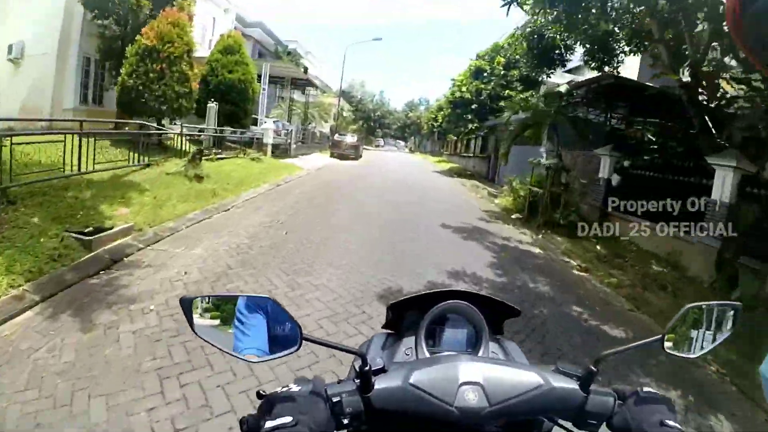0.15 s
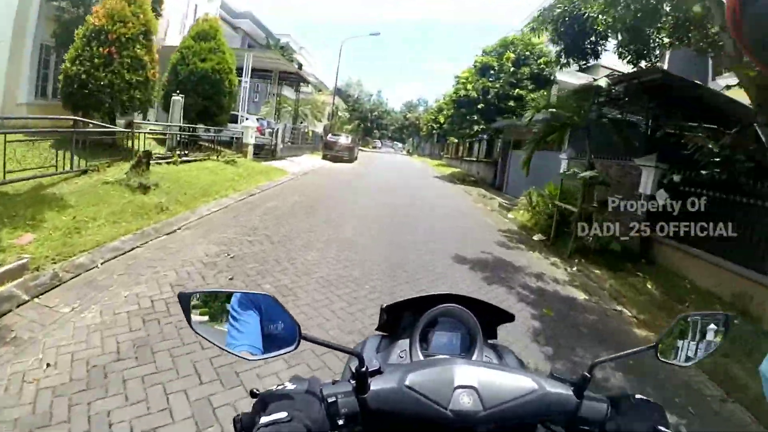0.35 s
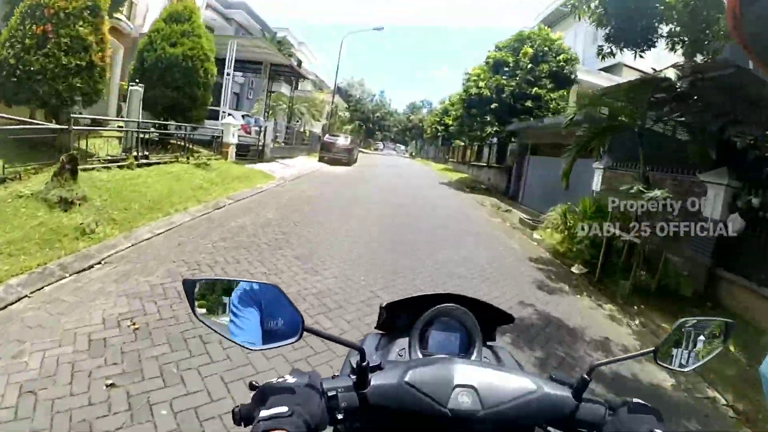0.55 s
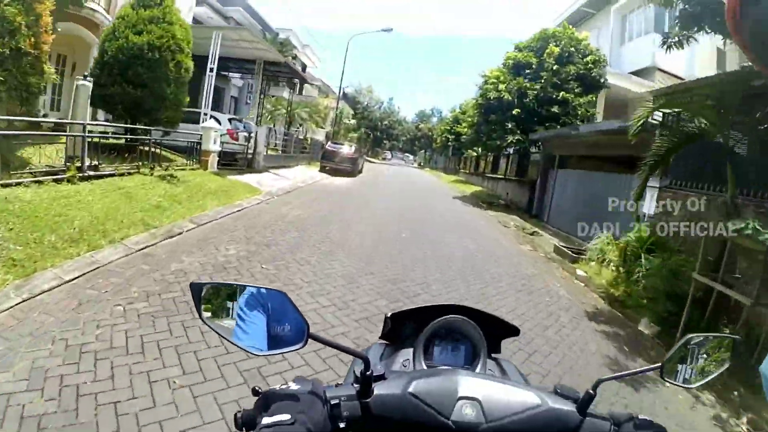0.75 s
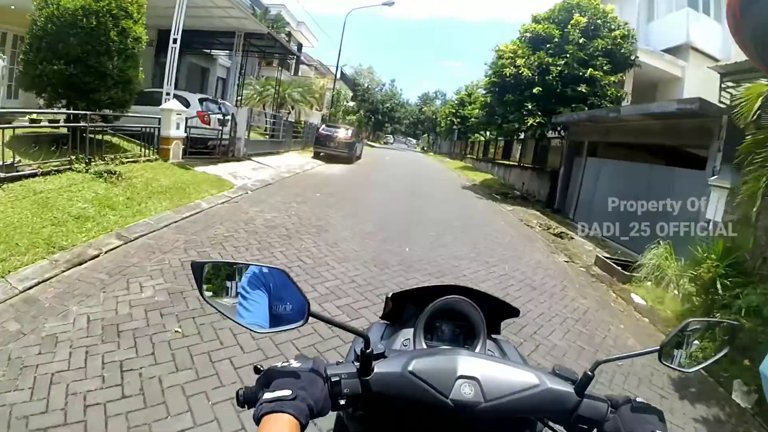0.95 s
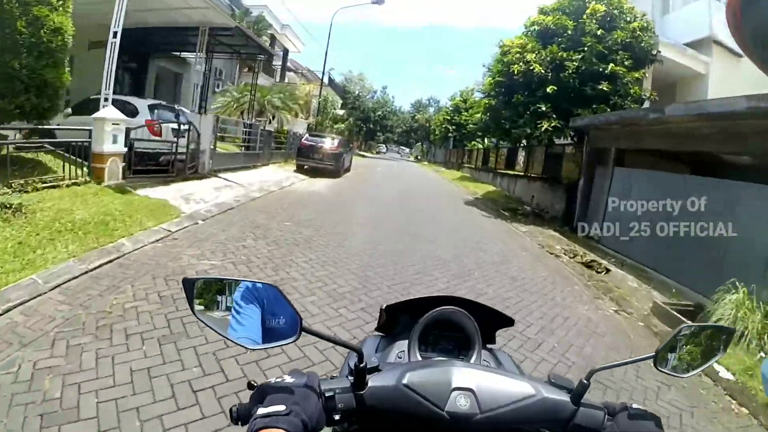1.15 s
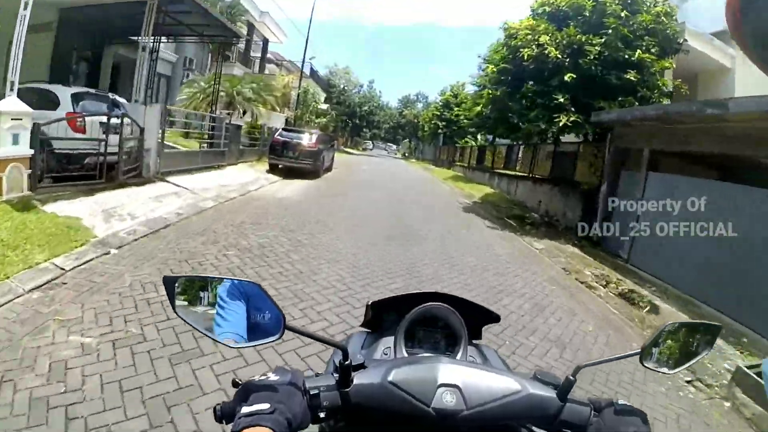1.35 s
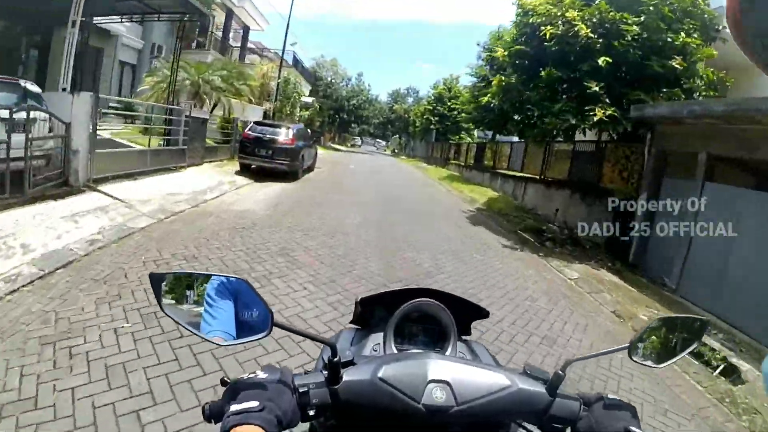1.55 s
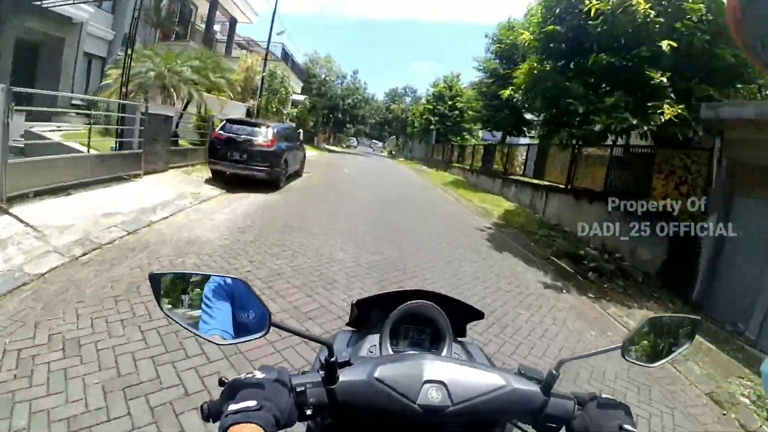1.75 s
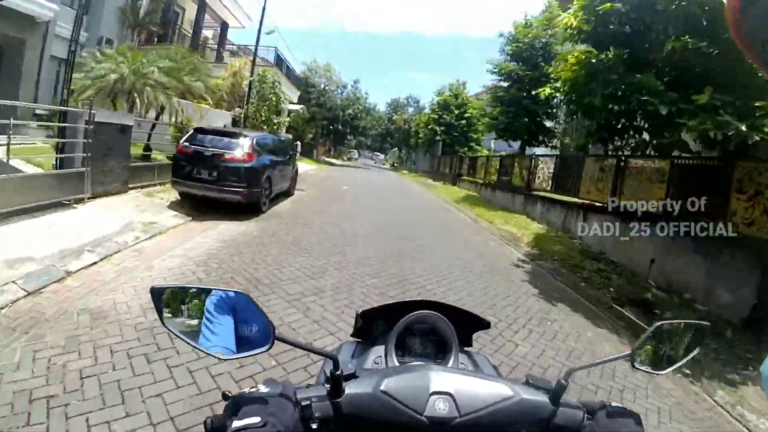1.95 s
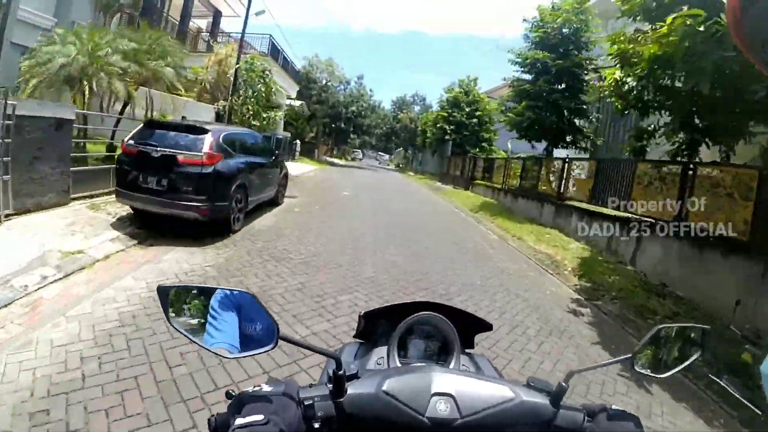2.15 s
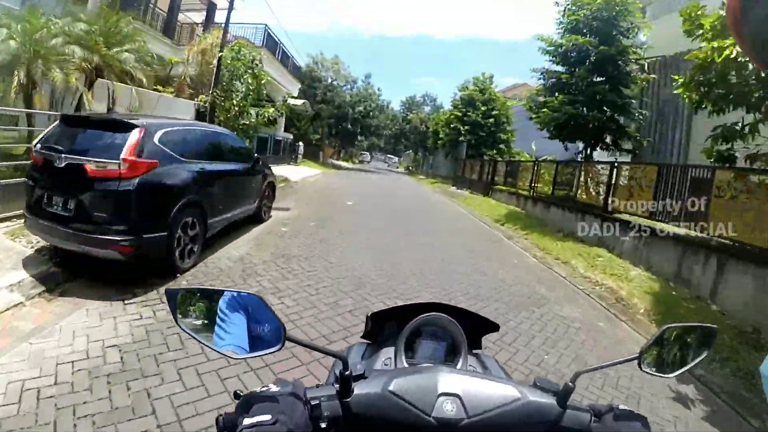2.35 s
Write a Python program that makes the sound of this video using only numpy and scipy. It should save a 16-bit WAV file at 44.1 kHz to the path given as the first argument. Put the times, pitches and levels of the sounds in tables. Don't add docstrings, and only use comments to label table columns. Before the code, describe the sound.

A small single-cylinder scooter engine hums steadily, with muffled tyre and wind rush over paving blocks

```python
import sys
import numpy as np
from scipy import signal
from scipy.fft import rfft, irfft, next_fast_len
from scipy.io import wavfile
from scipy.ndimage import uniform_filter1d, map_coordinates

SR = 44100
rng = np.random.default_rng(int(sys.argv[2]) if len(sys.argv) > 2 else 0)


def gain_from_db(level_db):
    decades = np.asarray(level_db, float) / 20
    return 10 ** decades


def waveform_to_disk(signal):
    frames = np.transpose(np.atleast_2d(signal))
    scaled = np.clip(frames, -1, 1) * 32767
    samples = np.round(scaled).astype(np.int16)
    wavfile.write(sys.argv[1], SR, samples)


N = 109897


def unit(x):
    return x / np.sqrt(np.mean(x ** 2) + 1e-20)


def curves(rows):
    s, *cols = np.transpose(rows)
    return [np.interp(np.arange(N) / SR, s, c) for c in cols]


def wobble(rate):
    return map_coordinates(rng.standard_normal(400), [np.arange(N) * rate / SR])


def rush(spectrum, patchy_db):
    z = signal.stft(rng.standard_normal(N + 1024), nperseg=512)[2]
    field = uniform_filter1d(rng.standard_normal(z.shape), size=5, axis=0)
    field = uniform_filter1d(field, size=5, axis=1)
    x = signal.istft(z * gain_from_db(patchy_db * unit(field)), nperseg=512)[1][:N]
    m = next_fast_len(N + 8192)
    f, db = np.transpose(spectrum)
    log_f = np.log(np.fft.rfftfreq(m, 1 / SR) + 1)
    gain = gain_from_db(np.interp(log_f, np.log(f + 1), db, left=-150, right=-150))
    return unit(irfft(rfft(x, m) * gain, m)[:N])


# t/s, peak level/dB, ring f/Hz, time to fade by
# 60 dB t60/s
CLEAR_TICKS = [(.0002, -48, 13000, .002), (.4404, -62, 10300, .008), (.5731, -54, 4400, .008),
               (.6035, -47, 4750, .012), (.6848, -41, 5000, .003), (.6849, -45, 7500, .002),
               (.685, -52, 13000, .0015), (.697, -51, 4900, .008), (.8925, -49, 5600, .008),
               (.8944, -62, 9500, .004), (1.005, -61, 11500, .004), (1.1338, -54, 4500, .008),
               (1.1518, -48, 4600, .008), (1.1519, -60, 7500, .004), (1.229, -61, 13600, .005),
               (1.4636, -51, 5100, .008), (1.4637, -59, 7500, .004), (1.69, -58, 7000, .005),
               (1.7349, -51, 14000, .005), (1.7353, -63, 10500, .002), (1.8502, -52, 4200, .008),
               (2.0015, -59, 11500, .006), (2.0016, -60, 8500, .004), (2.108, -57, 8500, .008),
               (2.3211, -65, 9500, .005), (2.385, -60, 10500, .004)]


def grit():
    scratch = .05
    t = np.arange(600) / SR
    faint = [(a * N / SR, -65 - 3 * np.log(c) - 14 * b, 4000 + 6000 * b, .006)
             for a, b, c in rng.uniform(.02, 1, size=(60, 3))]
    out = np.zeros(N + SR)
    for s, db, hz, t60 in list(CLEAR_TICKS) + faint:
        jitter = unit(uniform_filter1d(rng.standard_normal(len(t)), size=24))
        ring = np.sin(2 * np.pi * hz / SR * np.cumsum(1 + scratch * jitter))
        onset = 1 - np.exp(-t / (.06 * t60))
        out[round(s * SR):][:len(t)] += gain_from_db(db + 5 - 60 * t / t60) * ring * onset
    return out[:N]


# t/s, peak level/dB, ring f/Hz
JOINT_SLAPS = [(.372, -17, 520), (.4025, -24, 600), (.433, -17, 422), (.493, -27, 500), (.5705, -17, 620),
               (1.005, -15, 298), (1.395, -16, 299.3), (1.46, -16.5, 280), (1.491, -16, 400),
               (1.701, -14.5, 400), (2.004, -16.5, 330), (2.095, -23, 400), (2.243, -14, 309.5),
               (2.304, -13, 266)]


def joints():
    ring_cycles = 2.4
    t = np.arange(900) / SR
    weak = [(a * N / SR, -29 - 3 * np.log(c), 280 + 600 * b)
            for a, b, c in rng.uniform(.05, 1, size=(50, 3))]
    out = np.zeros(N + SR)
    for s, db, hz in list(JOINT_SLAPS) + weak:
        fade = gain_from_db(db + 3.5 - 40 * t * hz / ring_cycles)
        onset = 1 - np.exp(-t * hz * 10)
        out[round(s * SR):][:len(t)] += fade * np.sin(2 * np.pi * hz * t) * onset
    return out[:N]


# t/s, level/dB
ROAD_ROAR = [
    (0, -39),
    (.6, -38),
    (1.2, -37.5),
    (1.7, -36),
    (2.1, -36),
    (2.49, -36),
]
# t/s, f/Hz, level/dB
BOUNCE = [(0.0, 11, -24), (0.07, 11.2, -27), (0.13, 12.4, -33), (0.19, 12.82, -38), (0.28, 12.91, -21),
          (0.69, 12.8, -30.5), (1.05, 12.89, -25.5), (1.07, 12.6, -28), (1.38, 12.88, -21),
          (1.43, 12.65, -11.5), (1.48, 13.15, -17.5), (1.8, 12.92, -13.5), (1.94, 12.26, -27.5),
          (2.02, 12.6, -19), (2.1, 11.4, -24), (2.2, 11.4, -32), (2.29, 11.4, -17.5), (2.49, 20, -31)]
# f/Hz, level/dB per Hz
SHAKE_COLOUR = [(2, -21), (7, -0.5), (14, 0.5), (20, 2), (28, 2), (38, -28), (50, -10)]


def suspension():
    hz, db = curves(BOUNCE)
    roar_db, = curves(ROAD_ROAR)
    bob = np.sqrt(2) * gain_from_db(db) * np.sin(2 * np.pi * np.cumsum(hz) / SR)
    shake_db = -26 + 1.6 * (roar_db - roar_db.mean()) + 1.5 * wobble(3.3)
    return bob + gain_from_db(shake_db) * rush(SHAKE_COLOUR, patchy_db=-1.5)


# f/Hz, width/Hz, level/dB
FAIRING_MODES = [(942, 60, -57.5), (1360, 17, -59), (1670, 30, -57.5), (1816, 28, -58.5), (1990, 20, -64),
                 (2430, 20, -63.5), (3080, 25, -85.5), (3600, 35, -76), (4300, 30, -76.5)]


def rattle():
    t = np.arange(N) / SR
    out = np.zeros(N)
    for hz, width, db in FAIRING_MODES:
        turn = 2 * np.pi * hz * t
        out += gain_from_db(db) * (wobble(width) * np.cos(turn) + wobble(width) * np.sin(turn))
    return out


# f/Hz, level/dB per Hz
ROAD_COLOUR = [(38, 2), (100, -8), (330, -10), (460, -14.5), (620, -14.5), (950, -19.5), (1400, -25),
               (1700, -50.5)]
PANEL_COLOUR = [(1200, -52), (1500, -3), (1800, -2.5), (2210, -8.5), (2420, -8.5), (2530, -8.5),
                (2670, -7.5), (2720, -38)]
HISS_COLOUR = [(2500, -29), (2720, 0), (3300, -5.5), (5200, -7), (7000, -15), (10000, -24.5), (13000, -29),
               (15500, -31)]
# patchiness level/dB, swell per firing level/dB, swell place/cycle
PATCHINESS = (0.96, 0.6, 0.57)
SWELL = (.15, .5, .6)
SWELL_PLACE = (0.89, .9, .6)


def road(cycle):
    roar_db, = curves(ROAD_ROAR)
    colours = (ROAD_COLOUR, PANEL_COLOUR, HISS_COLOUR)
    over_roar_db = (9.5, -11, -21.5)
    out = np.zeros(N)
    for colour, over_db, swell_db, place, patchy_db in zip(colours, over_roar_db, SWELL, SWELL_PLACE, PATCHINESS):
        angle = 2 * np.pi * (cycle - place)
        beat_db = swell_db * (np.cos(angle) + 0.83 * np.cos(2 * angle))
        level_db = roar_db + over_db + 0.72 * wobble(20) + beat_db
        out += gain_from_db(level_db) * rush(colour, patchy_db)
    return out


# t/s, firing rate f/Hz, load level/dB
ENGINE_RUN = [
    (0, 32.96, -27.5),
    (.5, 32.82, -28),
    (1.4, 33.0, -27.5),
    (1.7, 33.01, -27),
    (2.1, 33.31, -26.5),
    (2.49, 33.17, -28),
]


def crank():
    jitter = .002 * wobble(24.97)
    return np.cumsum(curves(ENGINE_RUN)[0] * (1 + jitter)) / SR


ORDER_LEVELS = [-3, 0.5, -21.5, -3.5, -8, -17.5, -19.5, -17, -18, -15, -21, -11, -34, -35.5, -30, -18.5,
                -28, -21.5, -21, -22, -25.5, -31, -35.5, -37.5, -38.5, -36.5, -40.5, -22, -28, -25.5, -24,
                -29, -41.5, -28.5, -33, -38, -36, -41.5, -40, -38.5, -35]
# t/s, favoured f/Hz, contrast level/dB
CAR_FLANK = [
    (0, 401, 1),
    (2.1, 400, -0.5),
    (2.3, 323, 4),
    (2.49, 330, 10.5),
]


def exhaust(cycle):
    drift_db, drift_rate = .8, 9
    pipe_spread = .045
    boom_width_hz = 50
    rate_hz, load_db = curves(ENGINE_RUN)
    boom_hz, boom_db = curves(CAR_FLANK)
    hum = np.zeros(N)
    for k, db in enumerate(ORDER_LEVELS, 1):
        off_boom = np.clip((k * rate_hz - boom_hz) / boom_width_hz, -2, 2)
        level_db = db + boom_db * np.sinc(off_boom) + drift_db * wobble(drift_rate)
        hum += gain_from_db(level_db) * np.cos(2 * np.pi * (k * cycle - pipe_spread * k * k))
    return np.sqrt(2) * gain_from_db(load_db) * hum


def scene():
    cycle = crank()
    ride = grit() + joints() + suspension() + rattle()
    return (ride + road(cycle) + exhaust(cycle))[None]


def low_pass(x):
    return signal.sosfilt(signal.butter(12, 15500, fs=SR, output="sos"), x)


# f/Hz, level/dB
SILENT_SPOTS = [(4000, -18), (8000, -8), (11000, -4), (15000, -1.5)]
# f/Hz, scatter level/dB
UNEVEN_BANDS = [(5000, 0), (9000, 1), (13000, 3), (15500, 3.5)]


def record(dry):
    padded = np.pad(dry, [(0, 0), (0, 4096)], 'reflect')
    hz, _, z = signal.stft(padded, SR, nperseg=2048, boundary='even')
    size = abs(z)
    local = uniform_filter1d(uniform_filter1d(size, size=81, axis=1), size=3, axis=2)
    bands = unit(uniform_filter1d(rng.standard_normal(z.shape[1:]), size=50, axis=0))
    edge_db = np.interp(hz, *np.transpose(SILENT_SPOTS))[:, None]
    edge = gain_from_db(edge_db + 1.5 * bands + .6 * rng.standard_normal(z.shape[2]))
    scatter_db = np.interp(hz, *np.transpose(UNEVEN_BANDS))[:, None]
    patches = unit(uniform_filter1d(rng.standard_normal(z.shape[1:]), size=36, axis=0))
    kept = uniform_filter1d(size, size=3, axis=1) > edge * local
    thin = signal.istft(z * gain_from_db(scatter_db * patches) * kept, SR, nperseg=2048)[1][:, :N]
    return low_pass(thin)


dry = scene()
out = record(dry)
waveform_to_disk(out)
```